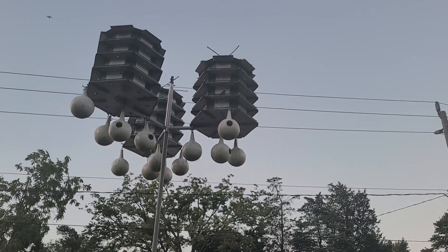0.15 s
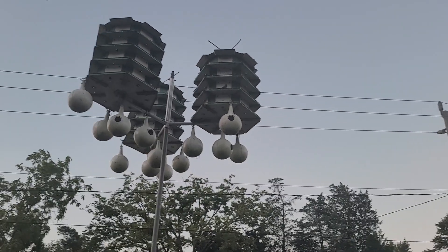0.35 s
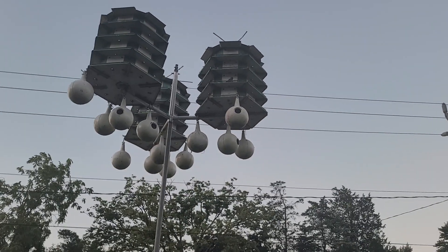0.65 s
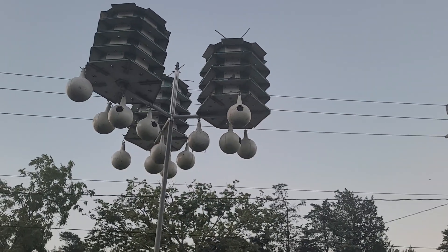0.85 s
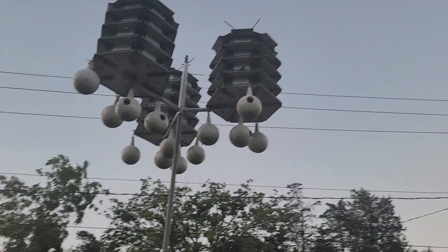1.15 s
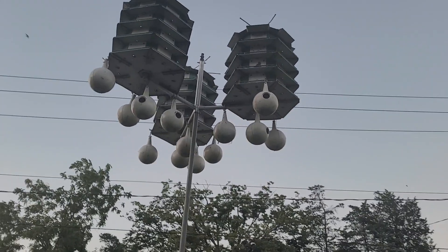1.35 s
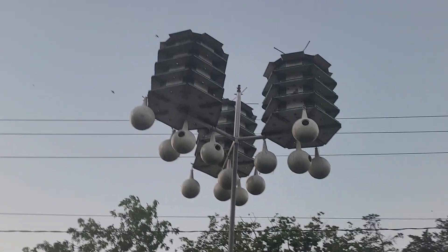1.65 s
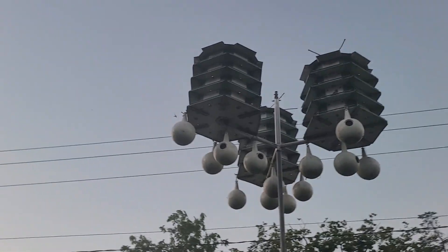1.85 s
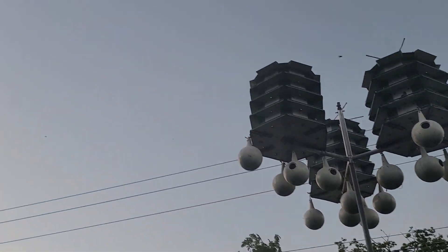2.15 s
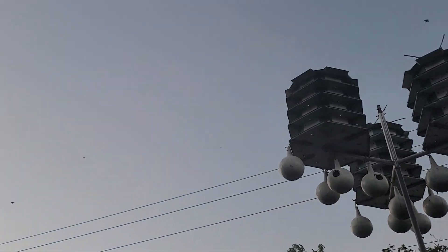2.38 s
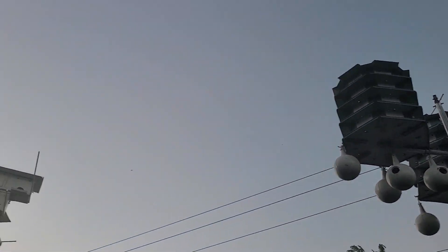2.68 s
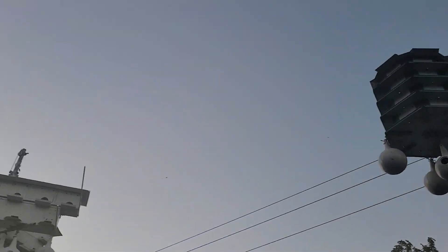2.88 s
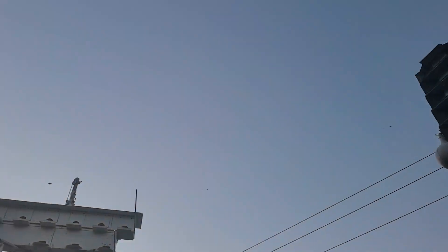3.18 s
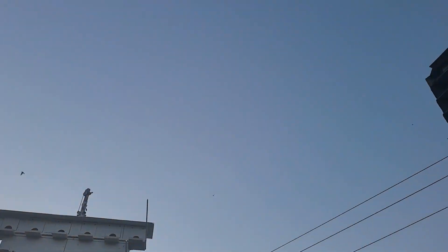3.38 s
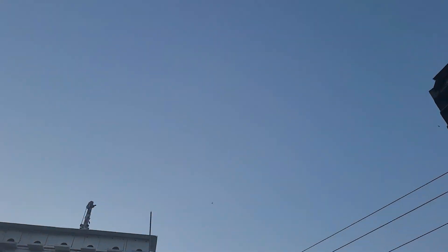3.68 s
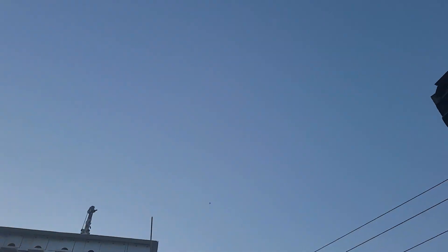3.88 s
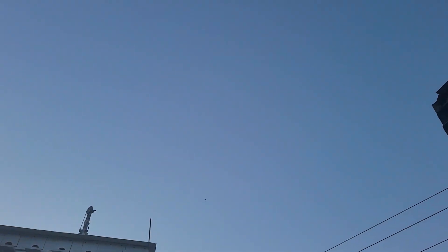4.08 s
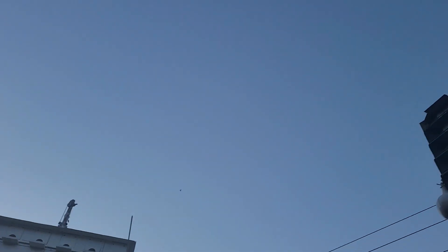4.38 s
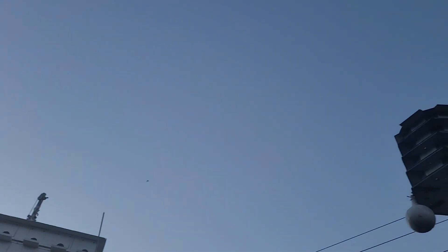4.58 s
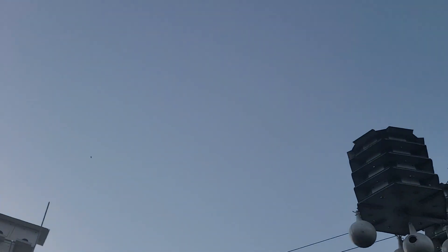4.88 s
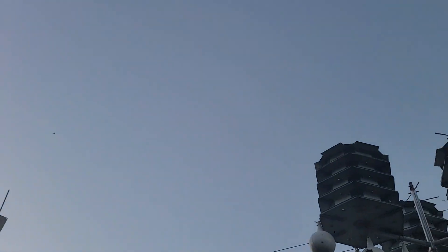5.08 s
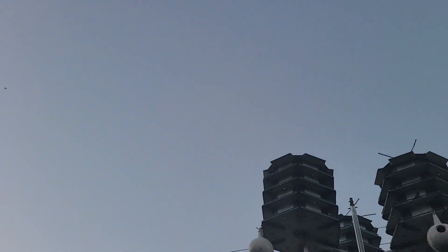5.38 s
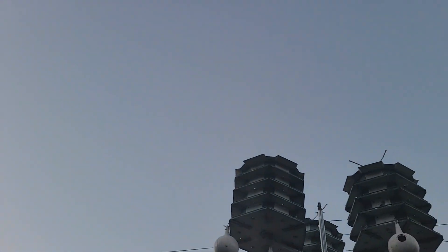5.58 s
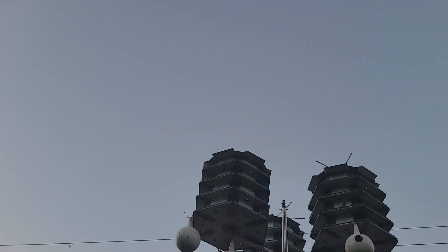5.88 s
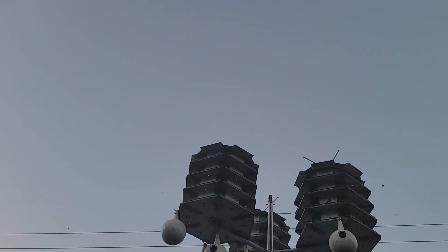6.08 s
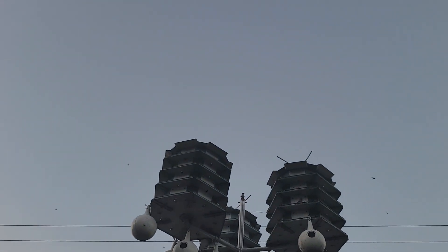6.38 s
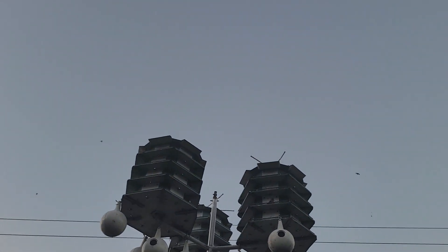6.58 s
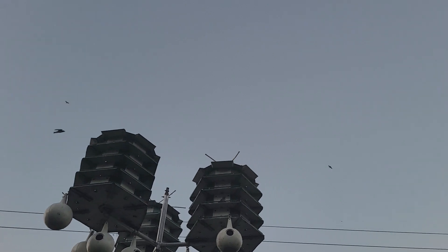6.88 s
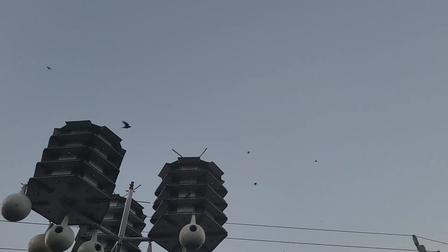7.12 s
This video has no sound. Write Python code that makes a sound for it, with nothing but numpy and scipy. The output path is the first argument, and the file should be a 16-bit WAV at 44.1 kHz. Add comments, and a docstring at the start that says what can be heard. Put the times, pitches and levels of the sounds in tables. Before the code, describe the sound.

Martins chirp outdoors in a steady run of short, high, downward-sliding calls, some raspy, over a faint distant rush and hum.

```python
"""Arched, down-sliding chirps, some pure, some rasping: purple martins circling their houses at dusk.
Each call is a whistle shaken by a fast flutter of the syrinx; farther birds add thin, quick slurs.
Buildings and trees answer faintly. Behind lie a distant rush, a low hum and the blur of the far flock.
Puffs of wind and a few handling knocks reach the hand-held microphones."""
import sys
import numpy as np
from scipy import signal
from scipy.fft import rfft, irfft, next_fast_len
from scipy.io import wavfile
from scipy.ndimage import map_coordinates

SR = 44100
rng = np.random.default_rng(int(sys.argv[2]) if len(sys.argv) > 2 else 0)


def put_to_file(sound):
    """Save the sound as 16-bit audio at rate SR, in the file named by the first command-line argument."""
    columns = np.atleast_2d(sound).T  # one column per channel
    safe = np.clip(columns, -1, 1)
    whole_steps = np.round(safe * 32767)
    wavfile.write(sys.argv[1], SR, whole_steps.astype(np.int16))


N = 319725

# Distant rush. Each row: time in seconds, relative levels of the low and middle bands in dB.
RUSH_LEVELS = [(0.0, -57, -62), (0.77, -65, -68), (2.28, -62, -69), (2.6, -63, -66), (3.59, -67, -72),
               (4.0, -66, -69), (5.51, -63, -77), (5.69, -68, -79), (6.7, -66, -74), (6.84, -69, -81),
               (7.25, -68, -79)]
# Hum lines. Each row: frequency in Hz, relative level in dB.
HUM_LINES = [(58, -6), (120, -4.5), (239, -8.5)]
# Level curves of hum, far flock and wind. Each row: time in seconds, relative level in dB.
HUM_LEVELS = [(0, -51), (.38, -49), (.48, -63.5), (4, -64.5), (7.25, -71)]
FLOCK_LEVELS = [(0, -65.5), (2.5, -56.5), (4.8, -75.5), (6.8, -72), (7.25, -102)]
WIND_LEVELS = [(0, -62.5), (2.7, -55.5), (4, -57.5), (6.7, -56), (7.25, -73)]
# Wind puffs and finger scuffs. Each row: start in seconds, length in seconds, level in dB.
WIND_PUFFS = [(4.546, 0.097, -44.5), (5.41, 0.12, -37.5), (5.629, 0.092, -39)]
FINGER_SCUFFS = [(4.765, 0.053, -63.5), (4.36, 0.069, -59)]
# Knocks. Each row: start in seconds, thud level in dB, tick level in dB, T60 in seconds.
FINGER_KNOCKS = [(1.161, -49, -78, 0.012), (2.235, -43, -79, 0.056), (4.204, -43, -46.5, 0.0099),
                 (4.377, -33.5, -45, 0.027), (4.387, -48, -56.5, 0.2), (4.412, -54, -70, 0.061)]

# Noise spectra of the sources. Each row: frequency in Hz, relative density in dB.
RUSH_LOW_SPECTRUM = [(40, -17), (100, 0), (150, 2.5), (195, -3), (250, 1.5), (330, -4.5), (480, -12),
                     (800, -21), (4000, -120)]
RUSH_MID_SPECTRUM = [(250, -13.5), (500, 2), (850, -1), (1180, -1), (1400, -1.5), (2100, -2.5), (3500, -10),
                     (4700, -19), (9000, -31), (16000, -43)]
FLOCK_SPECTRUM = [(800, -78.5), (2200, -7.5), (2500, 9), (3200, 10.5), (3500, -2.5), (3900, -57),
                  (7000, -120)]
HISS_SPECTRUM = [(1000, 2), (4000, -55), (5000, -4.5), (5800, 19.5), (6800, 4.5), (9000, -4.5), (16000, 6)]
WHINE_SPECTRUM = [(500, -70), (1000, -18), (1170, 5.5), (1350, -19.5), (2600, -71.5), (6000, -120)]
WIND_SPECTRUM = [(15, -32), (35, -12.5), (54, 2), (75, -2.5), (110, -9), (170, -21), (400, -57),
                 (2000, -120)]
THUD_SPECTRUM = [(60, -10), (220, 6.5), (500, 2), (1100, -4), (2000, -22), (16000, -72)]
TICK_SPECTRUM = [(1000, -54), (4500, -22), (7500, 8.5), (9500, -7.5), (13000, -2), (16000, -15)]
RASP_SPECTRUM = [(500, -26), (1800, -4), (2300, 7), (3500, 3), (4300, -3.5), (5200, -11.5), (6400, -12),
                 (8700, -17.5), (16000, -28.5)]
SHIMMER_SPECTRUM = [(4000, -36), (9000, -18), (12000, -4.5), (15000, 0.5)]
# Stereo likeness of noise. Each row: frequency in Hz, left-right correlation.
STEREO_CORRELATION = [(50, 0.78), (140, 0.85), (300, 0.76), (600, 0.02), (2000, -0.32), (10000, -0.26)]
# Yard decay. Each row: frequency in Hz, T60 in seconds.
YARD_T60 = [(300, .5), (3000, 0.77), (6000, 0.51), (14000, 0.39)]

# Quick slurs. Each row: start in seconds, starting pitch in Hz, level in dB.
QUICK_SLURS = [(.16, 3650, -52), (.338, 3100, -54), (.362, 2350, -56), (.35, 5300, -67), (.376, 3600, -59),
               (.853, 3700, -52), (.983, 4200, -59), (1.022, 4400, -61), (1.02, 2900, -60),
               (1.081, 3700, -50), (1.118, 2650, -59), (1.52, 3600, -47), (2.085, 4600, -64),
               (6.315, 4300, -73), (6.436, 5500, -66)]
# Other birds' whistles. Each row: start and length in seconds, first and last pitch in Hz, level in dB.
LONG_WHISTLES = [(.38, .08, 2050, 1850, -58), (1.92, .16, 6550, 6150, -68), (2.17, .13, 3950, 4750, -62),
                 (3.12, .11, 5450, 5200, -65), (6.742, .05, 5550, 4850, -60)]
# Passband of a martin's throat. Each row: frequency in Hz, gain in dB.
THROAT_GAIN = [(1500, 11), (2200, 0), (3450, 0.5), (3650, 0), (3900, -9), (5000, -28.5)]
# Martin calls. Each row: crest time, rise and fall in seconds, crest pitch in Hz, level in dB,
# rasp from 0 to 1, relative overtone and shimmer levels in dB, left minus right in dB.
CALLS = [(.525, .035, .135, 3420, -39, .95, -25, -37, 1.5),
         (.725, .031, .12, 3270, -37, .8, -29, -33.5, 10.5), (1.24, .06, .14, 3420, -38, .8, -24, -32, -1),
         (1.436, .026, .065, 3120, -53, .8, -25, -41, 5), (1.631, .06, .09, 3048, -48, .4, -33, -44, 8),
         (1.76, .06, .11, 3360, -39.5, .8, -24, -39, 0),
         (1.912, .052, .103, 3240, -37.5, .45, -24, -35.5, 8.5),
         (2.061, .036, .114, 3260, -44, .7, -20, -49, 2.5),
         (2.185, .03, .115, 3280, -32.5, .35, -26, -33, 7),
         (2.435, .075, .145, 3400, -40.5, .9, -24, -46.5, 2),
         (2.665, .035, .075, 3400, -55, .45, -27, -33, 3.5),
         (2.778, .046, .122, 3290, -33.5, .9, -28, -43, 4), (3.078, .068, .192, 3380, -38, .7, -22, -43, 2),
         (3.426, .066, .11, 3334, -42, .3, -28, -37, 3.5),
         (3.555, .055, .125, 3470, -33, .95, -26.5, -37.5, 0),
         (3.86, .075, .115, 3270, -43, .3, -30, -28, 6), (4.101, .031, .07, 3460, -41.5, .8, -20, -35, 4),
         (4.19, .08, .12, 3300, -39.5, .15, -29, -30.5, 4.5),
         (4.335, .05, .115, 3360, -35.5, .95, -27, -30, 5),
         (4.525, .075, .12, 3280, -34.5, .1, -32, -30, 5),
         (4.93, .075, .155, 3395, -33.5, .1, -25, -27.5, 6),
         (5.26, .08, .14, 3310, -31.5, 0, -29, -29.5, 7.5),
         (5.578, .083, .137, 3310, -33.5, .05, -25.5, -26, 4),
         (5.845, .06, .105, 3470, -36.5, .7, -26, -57, 8.5),
         (5.927, .027, .158, 3202, -32.5, .25, -29, -28, 5), (6.105, .03, .105, 2980, -46, 1, -31, -41, 0),
         (6.418, .058, .072, 3250, -44, .35, -26, -38, 4),
         (6.504, .034, .106, 3040, -36, .65, -21.5, -27.5, 4.5),
         (6.7, .085, .12, 3250, -32.5, .45, -20, -32, 1)]

CLIMB_HZ, CLIMB_S = 290, .08  # a rise this long starts this far under the crest
SAG_TARGET_HZ, RASP_SAG_HZ = 2580, 350  # rasp lowers the target
SWELL_DB_PER_S, PEAK_LAG_S = 115, .034
FADE_DB, RASP_FADE_DB, FADE_EXPONENT = 5.5, 2, 1.7
OPENING_DB, OPENING_HOLD_S, OPENING_FADE_DB_PER_S = -47, .025, 400
LEFT_LEAD_S, LEFT_LEAD_S_PER_DB = .000205, .000007
SLUR_S, SLUR_FALL_OCTAVES_PER_S = .044, 9
BAND_LIMIT_HZ = 15800


def amp(db):
    """Decibels to gain."""
    return 10 ** (np.asarray(db) / 20)


def unit_rms(x):
    """Scale to rms 1."""
    return x / np.sqrt(np.mean(x ** 2) + 1e-20)


def at_hz(points, hz):
    """Interpolate a table on a log frequency axis."""
    knots_hz, values = np.transpose(points)
    return np.interp(np.log(hz + 1), np.log(knots_hz + 1), values)


def curves(rows):
    """One value per sample for each column after the time."""
    times_s, *columns = np.transpose(rows)
    return [np.interp(np.arange(N) / SR, times_s, column) for column in columns]


def wobble(rate_hz, size=N):
    """Smooth random curve with knots at rate_hz."""
    knots = rng.standard_normal(int(N * rate_hz / SR) + 4)
    return map_coordinates(knots, [np.arange(size) * rate_hz / SR])


def filtered(x, response):
    """Apply a frequency response."""
    n = x.shape[-1]
    n_fft = next_fast_len(n + 4096)
    return irfft(rfft(x, n_fft) * response(np.fft.rfftfreq(n_fft, 1 / SR)), n_fft)[..., :n]


def noise(spectrum, size=N):
    """Coloured stereo noise, rms 1, alike on both sides only in the bass."""
    def mid_side_gains(hz):
        angle = np.arccos(np.clip(at_hz(STEREO_CORRELATION, hz), -1, 1)) / 2
        return amp(at_hz(spectrum, hz)) * [np.cos(angle), np.sin(angle)]
    mid, side = filtered(rng.standard_normal((2, size)), mid_side_gains)
    return unit_rms(np.array([mid + side, mid - side]))


def panned(pan_db):
    """Stereo gains; positive is left."""
    return unit_rms(amp([[pan_db / 2], [-pan_db / 2]]))


def add(out, start_s, x):
    """Mix x into out."""
    i = max(round(start_s * SR), 0)
    out[:, i:i + x.shape[-1]] += x[..., :max(N - i, 0)]


def arch(length_s):
    """Half-sine swell."""
    return np.sin(np.linspace(0, np.pi, int(length_s * SR)))


def distant_rush():
    """Two noise bands drifting in level."""
    low_db, mid_db = curves(RUSH_LEVELS)
    low_gain = amp(low_db + 3.5 + 1.3 * wobble(10))
    mid_gain = amp(mid_db + 6 + 1.5 * wobble(12))
    return low_gain * noise(RUSH_LOW_SPECTRUM) + mid_gain * noise(RUSH_MID_SPECTRUM)


def hum():
    """Three low tones wavering in level and phase."""
    t = np.arange(N) / SR
    tones = sum(amp(db + 1.8 * wobble(5)) * np.sin(2 * np.pi * hz * t + .5 * wobble(7))
                for hz, db in HUM_LINES)
    return amp(curves(HUM_LEVELS)[0] + 1) * tones


def far_flock():
    """Far calls blurred into a band of noise."""
    return amp(curves(FLOCK_LEVELS)[0] + 3.9 * wobble(2.2)) * noise(FLOCK_SPECTRUM)


def hiss():
    """Thin, steady hiss."""
    return amp(-77.5) * noise(HISS_SPECTRUM)


def whine():
    """Faint, distant narrow-band whine."""
    return amp(-79 + 2.5 * wobble(2.77)) * noise(WHINE_SPECTRUM)


def wind():
    """Light air rumbles on the microphones; stronger puffs hit the right one."""
    out = amp(curves(WIND_LEVELS)[0] + 1.38 * wobble(10)) * noise(WIND_SPECTRUM) * panned(-.97)
    for start_s, length_s, db in WIND_PUFFS:
        swell = arch(length_s)
        add(out, start_s, amp(db) * swell * noise(WIND_SPECTRUM, len(swell)) * panned(-17))
    return out


def handling():
    """Fingers knock and scuff the camera body."""
    out = np.zeros((2, N))
    t = np.arange(SR // 4) / SR
    for start_s, thud_db, tick_db, t60_s in FINGER_KNOCKS:
        thud = amp(thud_db) * noise(THUD_SPECTRUM, len(t))
        tick = amp(tick_db) * noise(TICK_SPECTRUM, len(t))
        add(out, start_s, amp(-60 * t / t60_s) * (thud + tick))
    for start_s, length_s, db in FINGER_SCUFFS:
        swell = arch(length_s)
        add(out, start_s, amp(db + wobble(150, len(swell))) * swell * noise(TICK_SPECTRUM, len(swell)))
    return out


def yard_reverb(x):
    """Diffuse answer of trees and buildings; the high treble dies first."""
    hz, t, spectra = signal.stft(rng.standard_normal((2, SR)), SR, nperseg=256)
    decay = amp(-60 * t / at_hz(YARD_T60, hz)[:, None])
    build_up = 1 - np.exp(-t / .022)
    tail = signal.istft(spectra * decay * build_up, SR, nperseg=256)[1]
    return signal.fftconvolve(x, tail / np.linalg.norm(tail[0]), axes=1)[:, :N]


def scattered(x, scatter_db, spread_s, count=12):
    """Direct sound plus weak copies off ground and bird houses, at unchanged energy."""
    paths = np.zeros((2, SR // 8))
    paths[:, 0] = 1
    for channel in paths:
        delays_s = np.minimum(.002 + rng.exponential(spread_s, count), .1)
        gains = amp(scatter_db) * rng.standard_normal(count) / np.sqrt(count)
        np.add.at(channel, (delays_s * SR).astype(int), gains)
    heard = signal.fftconvolve(np.atleast_2d(x), paths, axes=1)
    heard /= np.linalg.norm(heard, axis=1, keepdims=True)
    return heard * np.linalg.norm(x, axis=-1, keepdims=True)


def placed(x, pan_db):
    """The farther left a bird, the louder and earlier in the left microphone."""
    lead_s = LEFT_LEAD_S + LEFT_LEAD_S_PER_DB * pan_db
    return panned(pan_db) * filtered(x, lambda hz: np.exp(np.pi * lead_s * hz * np.array([[1j], [-1j]])))


def slur(length_s, start_hz, end_hz):
    """Thin, slightly husky glide, repeated by a house wall."""
    swell = arch(length_s)
    pitch_hz = np.geomspace(start_hz, end_hz, len(swell)) + 105 * wobble(900, len(swell))
    note = np.pad(np.sqrt(2) * swell * np.sin(2 * np.pi * np.cumsum(pitch_hz) / SR), (0, SR // 16))
    wall_echo = amp(-13) * np.roll(note, int(.031 * SR))
    return scattered(note + wall_echo, scatter_db=-8, spread_s=.01)


def farther_birds():
    """Quick slurs and longer whistles, with faint chatter in the first seconds."""
    out = np.zeros((2, N))
    fall_ratio = 2 ** (-SLUR_FALL_OCTAVES_PER_S * SLUR_S)
    chatter = rng.uniform([.1, 2800, -69], [2.3, 4200, -60], (14, 3))
    for start_s, hz, db in [*QUICK_SLURS, *chatter]:
        add(out, start_s, amp(db) * slur(SLUR_S, hz, fall_ratio * hz))
    for start_s, length_s, start_hz, end_hz, db in LONG_WHISTLES:
        add(out, start_s, amp(db) * slur(length_s, start_hz, end_hz))
    return out


def opening_rasp():
    """Last rasp of a call already ending at time zero."""
    fading_s = np.maximum(np.arange(N) / SR - OPENING_HOLD_S, 0)
    level = amp(OPENING_DB - OPENING_FADE_DB_PER_S * fading_s)
    return level * (noise(RASP_SPECTRUM) + amp(-7) * noise(SHIMMER_SPECTRUM))


def martin_call(rise_s, fall_s, crest_hz, rasp, overtone_db, shimmer_db):
    """A whistle arches and falls while a fast flutter of the syrinx shakes its pitch and level."""
    n = int((rise_s + fall_s) * SR)
    t = np.arange(n) / SR - rise_s  # zero at the crest
    early = np.clip(-t / rise_s, 0, 1) ** 1.6
    late = np.clip(t / fall_s, 0, .95) ** (1.75 - .6 * rasp)
    sag_hz = crest_hz - SAG_TARGET_HZ + RASP_SAG_HZ * rasp
    arch_hz = crest_hz - CLIMB_HZ * (rise_s / CLIMB_S) ** 2 * early - sag_hz * late
    # rasp makes the flutter slower, deeper and less even
    beat_hz = (178 - 55 * rasp) * (1 + (.05 + .1 * rasp) * wobble(90, n))
    beat_phase = 2 * np.pi * np.cumsum(beat_hz) / SR
    flutter_hz = (78 + 105 * rasp) * (np.sin(beat_phase) - .35 * np.sin(2 * beat_phase))
    jitter_hz = (22 + 45 * rasp) * wobble(700, n) + 22 * wobble(45, n)
    phase = 2 * np.pi * np.cumsum(arch_hz + flutter_hz + jitter_hz) / SR

    flutter_db = -(1.3 + 4 * rasp) * np.cos(beat_phase)
    shake_db = (1.3 + 2 * np.sqrt(late)) * wobble(110, n)
    edges = np.clip((t + rise_s) / .018, 0, 1) * np.clip((fall_s - t) / .022, 0, 1)
    swell_db = SWELL_DB_PER_S * np.minimum(t - PEAK_LAG_S, 0)
    fade_shape = np.interp(t, [PEAK_LAG_S, fall_s], [0, 1]) ** FADE_EXPONENT
    fade_db = -(FADE_DB + RASP_FADE_DB * rasp) * fade_shape
    level = unit_rms(amp(flutter_db + shake_db)) * edges * amp(swell_db + fade_db)
    whistle = filtered(level * np.sqrt(2) * np.sin(phase), lambda hz: amp(at_hz(THROAT_GAIN, hz)))

    overtone_gain = amp(overtone_db + 1.5 + 6 * early - 10 * late)
    overtones = overtone_gain * (np.sin(2 * phase) + .38 * np.sin(3 * phase))
    undertone = amp(overtone_db - 2) * late * np.sin(phase / 2)  # uneven cycles add a lower octave
    # partials 4 and 5 open at the crest and fray in the fall
    frayed_phase = phase + (.08 + .32 * np.sqrt(late)) * wobble(1200, n)
    partials = (1 - .7 * rasp) * np.sin(4 * frayed_phase) + (.8 + 1.8 * rasp) * np.sin(5 * frayed_phase)
    sizzle = (.4 + .8 * rasp) * noise(SHIMMER_SPECTRUM, SR // 2)[:, :n]
    shimmer = amp(shimmer_db - 20 * np.sqrt(early) - 5 * late) * (partials + sizzle)
    grit = amp(overtone_db + 6 * rasp - 5 * early) * noise(RASP_SPECTRUM, SR // 2)[:, :n]
    voice = whistle + level * (overtones + undertone + shimmer + grit)
    return scattered(voice, scatter_db=-6.5 + 2.5 * rasp, spread_s=.012)


def martins():
    """Each call from its own place in the sky."""
    out = np.zeros((2, N))
    for crest_s, rise_s, fall_s, crest_hz, db, rasp, overtone_db, shimmer_db, pan_db in CALLS:
        call = martin_call(rise_s, fall_s, crest_hz, rasp, overtone_db, shimmer_db)
        add(out, crest_s - rise_s, amp(db) * placed(call, pan_db))
    return out


def scene():
    """Birds in the open yard over the evening background."""
    birds = martins() + opening_rasp() + farther_birds()
    background = whine() + distant_rush() + hum() + far_flock() + hiss()
    return birds + amp(-23.5) * yard_reverb(birds) + handling() + wind() + background


def record(dry):
    """Brick-wall low-pass at the band limit."""
    return filtered(dry, lambda hz: hz < BAND_LIMIT_HZ)


dry = scene()
out = record(dry)
put_to_file(out)
```